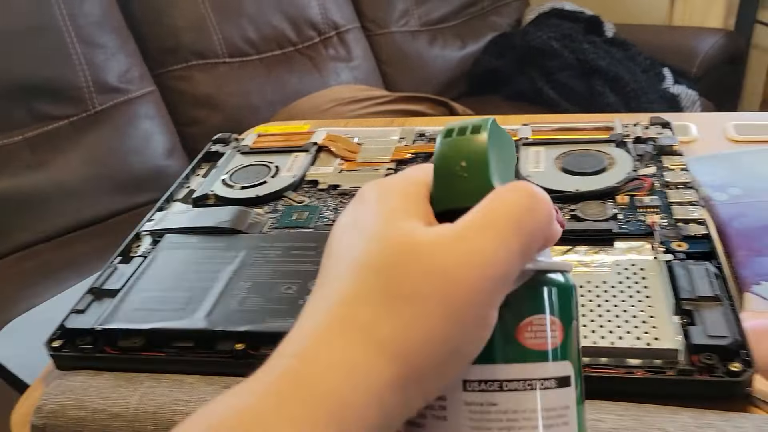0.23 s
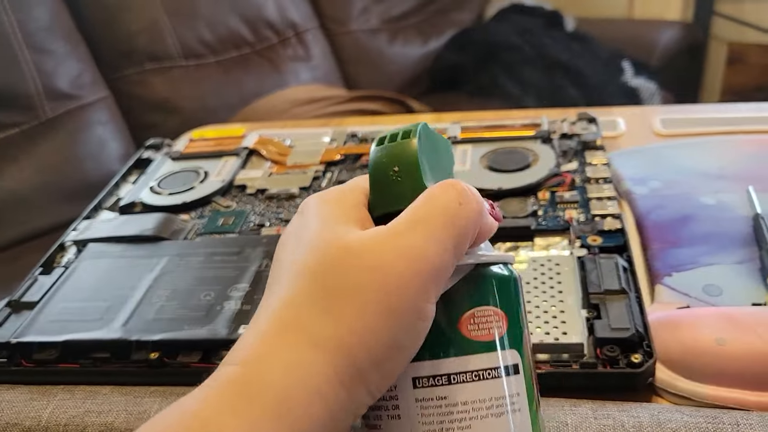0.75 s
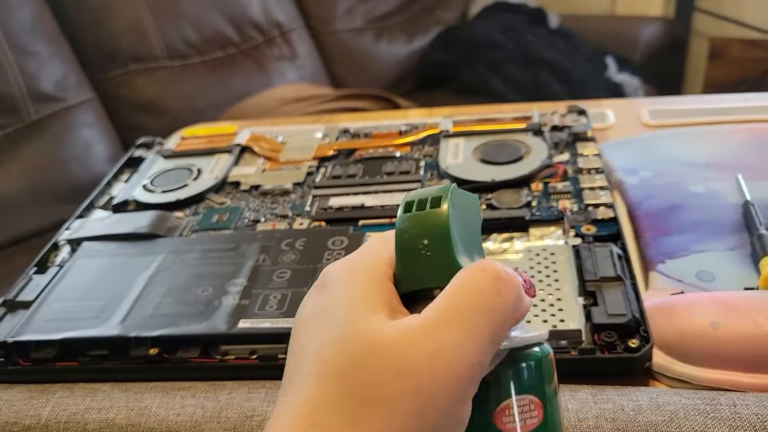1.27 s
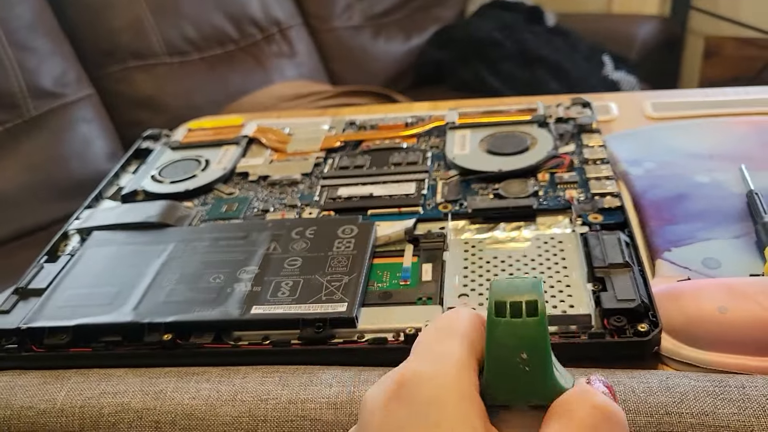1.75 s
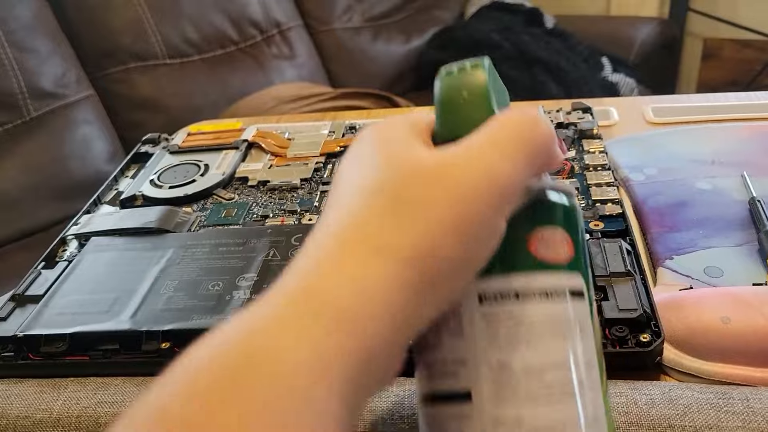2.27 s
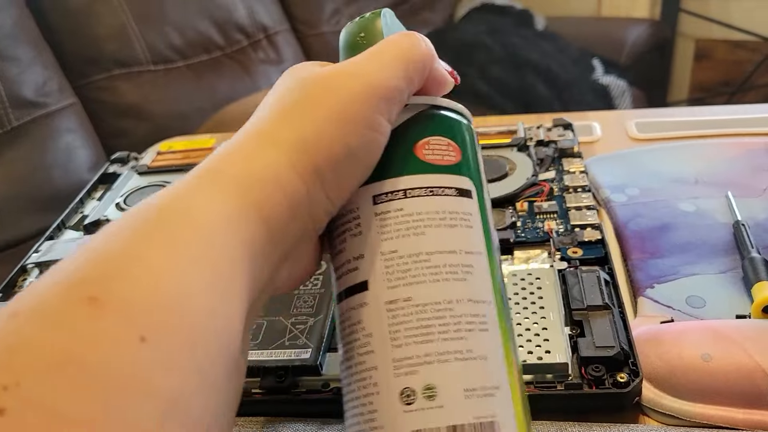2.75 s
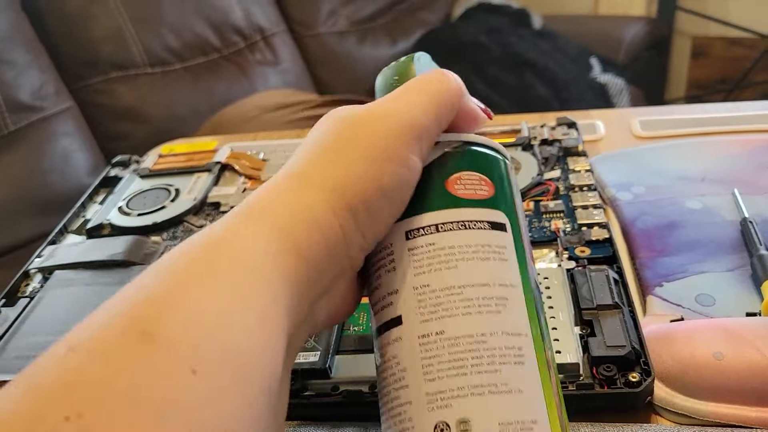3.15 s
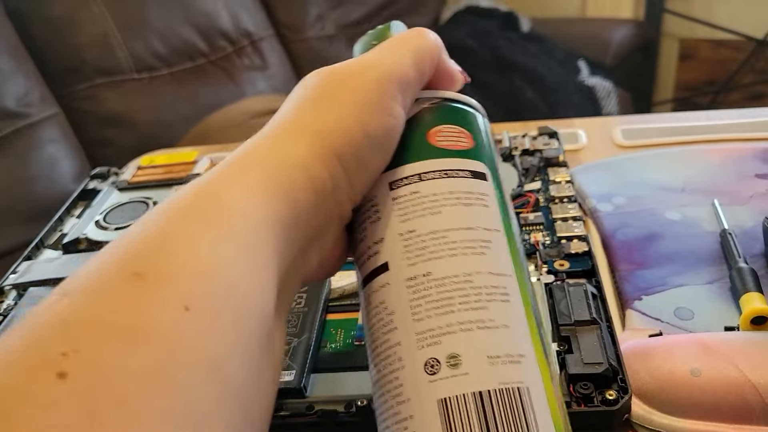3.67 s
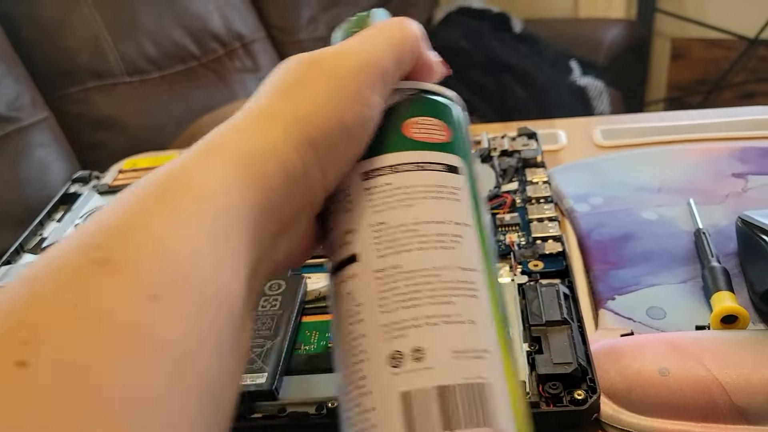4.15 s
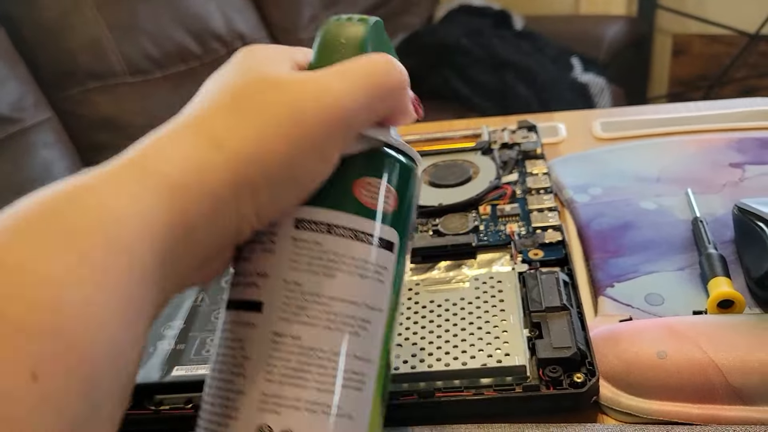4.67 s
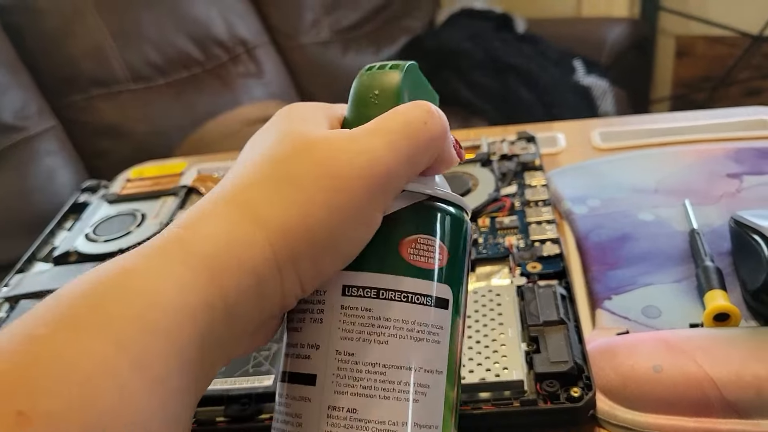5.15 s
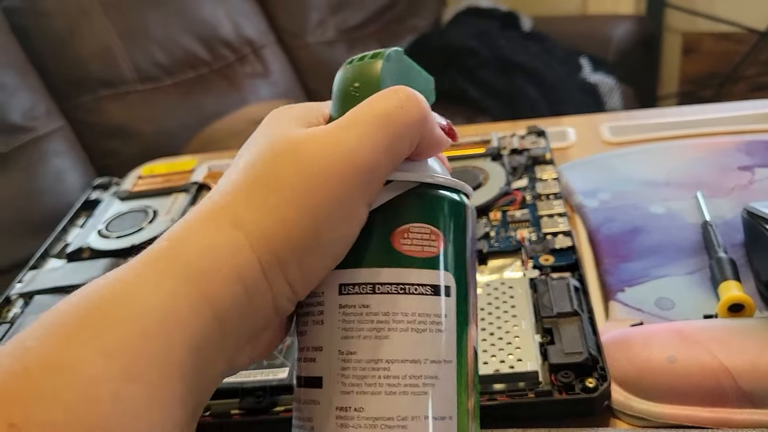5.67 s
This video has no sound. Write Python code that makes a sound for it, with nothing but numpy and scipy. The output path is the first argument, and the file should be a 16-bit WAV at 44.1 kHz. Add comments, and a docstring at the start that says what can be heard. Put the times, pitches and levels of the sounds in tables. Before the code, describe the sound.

Indoors, a handheld air duster spits loud bursts of sharp white hiss, each starting and stopping abruptly. Ten brief puffs come first, then a steadier jet of about seven tenths of a second that dips and brightens as it sweeps across a fan, then five even puffs. Between them are hand rustle, small plastic ticks and a faint low hum. The close stereo microphone sounds loud and compressed.

```python
"""A can of compressed air, close to the microphone, blows out an open laptop: ten puffs, a long blast, five more.
Each squeeze is coloured noise: a hiss at the nozzle, a rush over the board, resonances of nozzle and fan housing.
Trigger ticks and knocks are damped resonances; the hand rustles and spent air brushes the microphone.
Behind lie a living room's low hum and short ring; a limiter flattens the loud jets, slower than their first spit."""
import sys
import numpy as np
from scipy import signal
from scipy.fft import rfft, irfft
from scipy.io import wavfile

SR = 44100
rng = np.random.default_rng(int(sys.argv[2]) if len(sys.argv) > 2 else 0)


def master(y):
    """Save y as 16-bit WAV."""
    cut = np.clip(np.atleast_2d(y).T, -1, 1)
    pcm = np.round(cut * 32767)  # scale
    wavfile.write(sys.argv[1], SR, pcm.astype(np.int16))


N = 261072
TIME = np.arange(N) / SR
HZ = np.maximum(np.arange(N // 2 + 1) * SR / N, 1)
SIDES = np.array([[1], [-1]])   # left, right

# low hum of the room: pitch_hz, relative level_db (per Hz)
HUM_COLOUR = [(25, -5), (36, -0.5), (62, -1.5), (80, 0), (102, 3), (150, 3), (200, -1), (255, -12.5),
              (320, -2), (400, -14), (550, -11), (780, -28), (1500, -23.5), (4000, -58.5)]
HUM_DB = -52.5
# low rumble as the arm swings back: middle_s, length_s, peak level_db
ARM_SWINGS = [(4.74, 0.55, -47)]
# the room's ring by band: centre_hz, t60_s, relative level_db
ROOM_RING = [(200, 0.38, -19.5), (1000, 0.24, -11.5), (2760, 0.38, -10), (7000, 0.38, -17),
             (10660, 0.27, -17.5), (15000, 0.28, -18)]
# spent air brushing the microphone in mid-sweep: middle_s, length_s, peak level_db
DRAUGHTS = [(3.67, 0.15, -44), (3.81, 0.41, -48)]
# rustle of the hand: pitch_hz, relative level_db (per Hz)
RUSTLE_COLOUR = [(410, -28), (700, -2), (1200, 0.5), (1700, 3), (4130, 1), (7400, 1), (11000, -6),
                 (15500, -3)]
# the hand shifting on the can: middle_s, length_s, peak level_db
HAND_SHIFTS = [(0.95, 0.47, -51.5), (1.58, 1, -50.5), (2.8, 1.2, -51.5), (3.11, .08, -49.5),
               (3.32, 0.37, -51), (4.74, 0.69, -62.5), (5.45, 1.5, -60)]
GRIP_DB, RUSTLE_PAN_DB = -64.5, -6   # hand at rest; left minus right
# trigger and finger ticks: start_s, peak level_db, pitch_hz
TICKS = [(0.716, -8.5, 3200), (1.278, -34, 2800), (1.565, -39, 1090), (1.608, -29.5, 3200),
         (2.44, -32, 11000), (2.472, -33, 8180), (3.125, -39.5, 3000), (3.283, -34.5, 6120),
         (3.362, -39, 11000), (4.476, -47, 6140), (4.809, -33, 2140)]
# soft knocks as the trigger bottoms out or springs back: start_s, level_db before rise and decay, pitch_hz
KNOCKS = [(0.469, -19, 91), (.715, -27.5, 100), (.995, -26, 84.3), (1.326, -23.5, 107), (1.721, -24, 84),
          (1.968, -29, 92), (2.205, -33.5, 80), (2.596, -20, 216), (4.855, -38, 120)]

# cavities of nozzle and fan housing: centre_hz, width_hz, boost_db
CAVITIES = [(3090, 520, 1.8), (6350, 300, 3.5), (7350, 260, 3), (10300, 250, 2), (12520, 350, 3),
            (14750, 400, 2), (15400, 600, 2.5)]
# jet power common to both microphone ports: pitch_hz, share (0 to 1)
JET_LIKENESS = [(100, 0.83), (600, 0.83), (1300, 0.4), (3000, 0.32), (7000, 0.22), (15000, 0.44)]
# centres of rush, housing, hiss, neutral band and sizzle: centre_hz
PART_HZ = [1500, 3400, 6800, 10500, 14500]

# jet deep in the far fan: pitch_hz, relative level_db (per Hz)
BLAST_COLOUR = [(90, -26), (250, -17), (700, -20.5), (1100, -12), (1600, -11), (2000, -10), (2700, -6.5),
                (3150, 1), (4000, -4), (5300, -3), (6200, -1.5), (7500, 0), (10500, -5.5), (13000, -2),
                (15300, -0.5)]
# how squarely the sweeping jet meets the far fan, used about its mean: time_s, loudness_db
SWEEP = [(3.45, -17), (3.484, -14.5), (3.504, -15), (3.606, -19.5), (3.656, -15), (3.71, -15), (3.73, -20),
         (3.804, -22.5), (4.004, -15), (4.048, -15), (4.1, -14), (4.15, -17)]
# blast parts (rush, housing, hiss, sizzle): level_db, follows_sweep (dB per dB)
BLAST_PARTS = [(0, -0.2), (-1, 0.15), (-0.5, 0.86), (-1, 0.8)]
# the valve opens once, stays open and is eased shut
BLAST_OPEN_S, BLAST_SHUT_S, BLAST_DB = 3.448, 4.1525, -12
BLAST_OPENING_S, BLAST_CLOSING_DB_PER_S = 0.017, 354.5
SWEEP_DEPTH = 0.94   # dB of jet per dB of sweep

# short squeezes: fully_open_s, held_s, relative level_db, spit_db, aim_db (hiss gained on the board), pan_db (L-R)
PUFFS = [(0.267, 0.044, -14.5, -1.5, -2, 0.5), (0.472, 0.071, -8.5, 3.5, -1, 2.5),
         (0.717, 0.1, -11.5, 3.5, 1, 3), (0.995, 0.099, -11, 6.5, 1.5, 1.5), (1.318, 0.093, -12.5, 6, 2, 3),
         (1.644, 0.098, -13.5, 4, 4, 2.5), (1.908, 0.077, -14.5, 6.5, 4.5, 2),
         (2.139, 0.094, -13.5, 5, 9, 1), (2.541, 0.12, -10, 2, 4, 2.5), (2.816, 0.11, -11.5, 4, 1.5, 1.5),
         (4.859, 0.099, -11.5, 6.5, 0.5, 2.5), (5.105, 0.1, -13.5, 6, -1, 0.5),
         (5.357, 0.098, -12, 4, 1, 1), (5.613, 0.11, -14, 6.5, 1, 1), (5.876, 0.13, -13.5, 5, 2, 2)]
# jet close by: pitch_hz, relative level_db (per Hz)
PUFF_COLOUR = [(90, -23.5), (270, -14), (700, -21), (1050, -13), (1600, -11.5), (2000, -15), (3200, -6.5),
               (4200, -4.5), (6200, -0.55), (7500, 0.26), (9500, -3), (11200, -4.5), (13000, -0.5),
               (15300, -1.5)]
# balance of the near jet: pitch_hz, left_minus_right_db
PUFF_BALANCE = [(250, -2.5), (1600, -1), (3200, -4), (4600, -5), (6200, -6.5), (8300, -8.5), (10500, 0.3),
                (12800, -6.5), (15300, -5)]
# lead of the left port in the near jet's common part: pitch_hz, lead_rad
PUFF_PHASE = [(100, -0.5), (1600, 0.63), (2200, .5), (4200, 0.5), (7300, -3), (9100, -6), (11000, -5.5),
              (15000, -5)]
# puff parts (rush, housing, hiss, sizzle): level_db, follows_aim (dB per dB)
PUFF_PARTS = [(1, 0.83), (-1, 0.82), (-1.1, 1.0), (0.38, 0.84)]
# the finger starts gently and squeezes faster and faster until it has found its pace
FIRST_OPENING_S, QUICKEST_OPENING_S, QUICKENS_S_PER_S = 0.037, 0.015, 0.0093
SPIT_SIZZLE, SPIT_SIZZLE_S = 0.56, 0.0083   # extra share of treble in the first gas out, and its fade
BASS_BUILD_S, BASS_LACK_DB = .07, 27   # a squeeze shorter than this stirs up little bass

CUTOFF_HZ = 15900


def from_db(db):
    """Decibels to gain."""
    return 10 ** (np.asarray(db) / 20)


def rms_one(x):
    """Scale to unit rms."""
    return x / np.sqrt(np.mean(x ** 2) + 1e-20)


def at_hz(points, hz):
    """The second column of a spectrum, read on a log-frequency axis."""
    points = np.array(points)
    return np.interp(np.log(hz), np.log(points[:, 0]), points[:, 1])


def bins(size):
    """Frequencies of a transform of this length, at least 1 Hz."""
    return np.maximum(np.arange(size // 2 + 1) * SR / size, 1)


def drift(rate, size):
    """Straight lines between `rate` random points a second, drawn with spread 1."""
    return np.interp(np.arange(size) / SR * rate, np.arange(4096), rng.standard_normal(4096))


def noise(db, alike, size, phase=0.):
    """Coloured stereo noise, partly common to both ports; the left leads in that part by `phase`."""
    common, left, right = rfft(rng.standard_normal((3, size)))
    alike = np.clip(alike, 0, 1)
    common = common * np.exp(.5j * phase * SIDES)
    mixed = np.sqrt(alike) * common + np.sqrt(1 - alike) * np.array([left, right])
    return rms_one(irfft(mixed * from_db(db), size))


def swells(rows):
    """Power of soft movements, each rising and falling as an arch."""
    power = 0
    for middle, length, db in rows:
        arch = np.cos(np.pi * np.clip((TIME - middle) / length, -.5, .5)) ** 2
        power = power + from_db(db) ** 2 * arch
    return power


def room_hum():
    """Steady low noise of the room, swelling as the arm swings back."""
    level = np.sqrt(from_db(HUM_DB) ** 2 + swells(ARM_SWINGS))
    return level * noise(at_hz(HUM_COLOUR, HZ), 0.93, N)


def fading_ring(level_db=-48, fade_db_per_s=125):
    """The room is still ringing from a puff just before: dulled jet noise dying away."""
    colour = at_hz(BLAST_COLOUR, HZ) - 10 * np.log10(1 + (HZ / 8000) ** 4)
    return from_db(level_db - fade_db_per_s * TIME) * noise(colour, 0.18, N)


def room(x, first_echo_s=0.0067, size=32768):
    """Diffuse reflections: noise bands that each decay at their own pace, convolved with the source."""
    t, hz = np.arange(size) / SR, bins(size)
    alike = 1 / (1 + (hz / 1500) ** 2)   # long waves reach both ports as one
    white, tail = rfft(noise(0, alike, size)), 0
    centres = np.array(ROOM_RING)[:, 0]
    for part, (_, t60, db) in zip(np.eye(len(ROOM_RING)), ROOM_RING):
        share = np.interp(np.log(hz), np.log(centres), part)
        decay = from_db(-60 * t / t60) * (t > first_echo_s)
        tail = tail + irfft(white * share, size) * decay * from_db(db) / np.linalg.norm(decay)
    return signal.fftconvolve(x, tail, axes=1)[:, :N]


def draught(corner_hz=110):
    """Slow eddies of spent air at the microphone ports."""
    colour = -10 * np.log10(1 + (HZ / corner_hz) ** 4)
    return np.sqrt(swells(DRAUGHTS)) * noise(colour, 0.97, N)


def hand_rustle():
    """Friction noise of the hand on the can, stronger when it shifts."""
    level = np.sqrt(from_db(GRIP_DB) ** 2 + swells(HAND_SHIFTS))
    unsteady = from_db(SIDES * RUSTLE_PAN_DB / 2 + 1.5 * drift(33, N))
    return level * unsteady * noise(at_hz(RUSTLE_COLOUR, HZ), 0.2, N)


def ticks(t60_s=0.024):
    """Plastic trigger and fingers: a tiny burst of contacts in one damped resonance."""
    out = np.zeros((2, N))
    t = np.arange(4096) / SR
    for start, db, hz in TICKS:
        first = int(start * SR)
        contacts = rng.standard_normal((2, len(t))) * from_db(-60 * t / t60_s)
        tick = signal.lfilter(*signal.iirpeak(hz, 3, fs=SR), contacts)
        out[:, first:first + len(t)] += from_db(db) * tick / np.abs(tick).max()
    return out


def knocks(t60_s=0.068, rise_s=0.0093):
    """The can, damped by the hand, gives a few cycles of low ring."""
    out = np.zeros(N)
    t = np.arange(8192) / SR
    for start, db, hz in KNOCKS:
        first = int(start * SR)
        envelope = from_db(db - 60 * t / t60_s) * (1 - np.exp(-t / rise_s))
        out[first:first + len(t)] += envelope * np.sin(2 * np.pi * hz * t)
    return out


def cavities(hz):
    """Boost in dB from the resonances that the jet blows across."""
    return sum(db / (1 + (2 * (hz - centre) / width) ** 2) for centre, width, db in CAVITIES)


def moving_echoes(x, count=6):
    """Reflections off the laptop whose paths change as the can sweeps: the hiss gets a shifting comb."""
    out = x.copy()
    for k, delay_s in enumerate(rng.uniform(.0004, .004, count)):
        side = k % 2
        out[side] += .24 * np.interp(TIME - delay_s - 9e-5 * drift(4, N), TIME, x[side])
    return out


def blast(pan_db=-5.0, flutter_db=0.87, left_lead_s=2.7e-4):
    """The long jet, half hidden by the can; it is louder and brighter where its sweep meets the fan."""
    sweep_s, loudness_db = np.transpose(SWEEP)
    sweep_db = np.interp(TIME, sweep_s, loudness_db) - np.mean(loudness_db)
    rush, housing, hiss, sizzle = [db + follows * sweep_db for db, follows in BLAST_PARTS]
    opening_db = -30 * np.minimum((TIME - BLAST_OPEN_S) / BLAST_OPENING_S, 0) ** 2
    closing_db = -BLAST_CLOSING_DB_PER_S * np.maximum(TIME - BLAST_SHUT_S, 0)

    shadow = SIDES * pan_db / 2 * np.clip(HZ / 4000, 0, 1)   # short waves are shadowed most
    alike = at_hz(JET_LIKENESS, HZ) / (1 + HZ / 7000)
    # the hiss comes from the left, the rush from the whole board
    phase = 2 * np.pi * np.maximum(HZ - 1500, 0) * left_lead_s
    colour = at_hz(BLAST_COLOUR, HZ) + cavities(HZ) + shadow
    jet = rfft(moving_echoes(noise(colour, alike, N, phase)))

    # split the jet into its parts, so that each follows the sweep in its own measure
    swept = 0
    for part, db in zip(np.eye(len(PART_HZ)), [rush, housing, hiss, 0, sizzle]):
        share = np.interp(np.log(HZ), np.log(PART_HZ), part)
        swept = swept + irfft(jet * share, N) * from_db(db)
    level_db = BLAST_DB + opening_db + closing_db + SWEEP_DEPTH * sweep_db
    return swept * from_db(level_db + flutter_db * drift(90, N))


def nearby_echoes(hz, strength, longest_s, count=8):
    """Board, can and hand reflect the hiss within milliseconds: a comb in dB, drawn for each port and puff."""
    delays_s = rng.uniform(longest_s / 20, longest_s, (count, 2, 1))
    echoes = np.exp(-2j * np.pi * hz * delays_s).sum(axis=0)
    return 20 * np.log10(np.abs(1 + strength * echoes) + 0.25)   # the offset keeps the notches shallow


def aim_colour(hz, rush, housing, hiss, sizzle):
    """Where the jet lands decides which of its parts stand out (dB)."""
    return np.interp(np.log(hz), np.log(PART_HZ), [rush, housing, hiss, 0, sizzle])


def puff(row, closing_db_per_s=750, swell_db=4.0, flutter_db=1.23, gain_db=-0.57, size=16384):
    """One squeeze: the valve leaks, snaps open with its own strength of spit, holds, and shuts."""
    start, held, level_db, spit_db, aim_db, pan_db = row
    opening = max(FIRST_OPENING_S - QUICKENS_S_PER_S * start, QUICKEST_OPENING_S)
    hz, first = bins(size), int(start * SR) - size // 4   # room for the leak ahead of the opening
    t = (first + np.arange(size)) / SR - start

    aim = [db + follows * aim_db for db, follows in PUFF_PARTS]
    colour = at_hz(PUFF_COLOUR, hz) + cavities(hz) + aim_colour(hz, *aim)
    colour = colour + SIDES * (at_hz(PUFF_BALANCE, hz) + pan_db) / 2
    colour = colour - BASS_LACK_DB * max(1 - held / BASS_BUILD_S, 0) / (1 + (hz / 700) ** 4)
    comb = nearby_echoes(hz, strength=.13, longest_s=.002)
    jet = noise(colour + comb, at_hz(JET_LIKENESS, hz), size, phase=at_hz(PUFF_PHASE, hz))

    valve_db = -30 * np.minimum(t / opening, 0) ** 2 - closing_db_per_s * np.maximum(t - held, 0)
    # the half-open valve holds gas back; that gas then leaves all at once
    snapped = np.clip(t / .003 + 1, 0, 1)
    pressure_db = spit_db * (snapped * (1 + np.exp(-(t / .012) ** 2)) - 1)
    squeeze = np.sin(np.pi * np.clip(t / held, 0, 1))   # the finger presses hardest in mid-puff

    # the leak is thin; a harder jet strikes the board harder, so the low rush swells more than the hiss
    rush = signal.sosfilt(signal.butter(1, 2200, fs=SR, output="sos"), jet)
    rush_share = 0.59 * squeeze - .25 - 0.283 * (1 - snapped)
    sizzle = signal.sosfilt(signal.butter(1, 13000, "high", fs=SR, output="sos"), jet)
    sizzle_share = SPIT_SIZZLE * snapped * np.exp(-np.abs(t) / SPIT_SIZZLE_S)
    jet = jet + rush * rush_share + sizzle * sizzle_share

    jet_db = level_db + gain_db + valve_db + pressure_db + swell_db * squeeze
    jet = jet * from_db(jet_db + flutter_db * drift(89.5, size))
    return np.pad(jet, ((0, 0), (first, N)))[:, :N]


def scene():
    """Jets and trigger close by, ringing in the room, over the rustle of the hand and the low hum."""
    close = sum(puff(row) for row in PUFFS) + blast() + ticks() + knocks()
    return close + room(close) + fading_ring() + hand_rustle() + draught() + room_hum()


def smooth(v, seconds):
    """One-pole averaging with this time constant."""
    r = np.exp(-1 / (seconds * SR))
    return signal.lfilter([1 - r], [1, -r], v)


def limiter(x, threshold_db=-13, slope=0.61, release_db_per_s=140):
    """The gain drops a few milliseconds after the level passes the threshold, and creeps back."""
    power = smooth(np.mean(x ** 2, axis=0), .003)
    over_db = np.maximum(10 * np.log10(power + 1e-12) - threshold_db, 0)
    release_db = release_db_per_s * TIME
    held_db = np.maximum.accumulate(over_db + release_db) - release_db
    return x * from_db(-slope * smooth(held_db, .006))


def record(dry, low_cut_hz=38):
    """The microphone's chain: bass roll-off, limiter, full-scale clipping and a steep top cut."""
    heard = signal.sosfilt(signal.butter(2, low_cut_hz, "high", fs=SR, output="sos"), dry)
    top_cut = signal.ellip(12, .1, 70, CUTOFF_HZ, fs=SR, output="sos")
    return signal.sosfilt(top_cut, np.clip(limiter(heard), -1, 1))


dry = scene()
out = record(dry)
master(out)
```